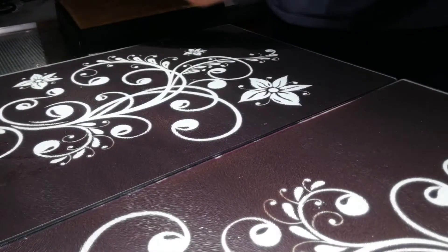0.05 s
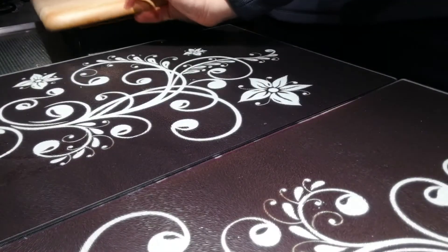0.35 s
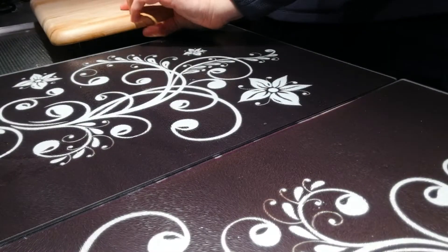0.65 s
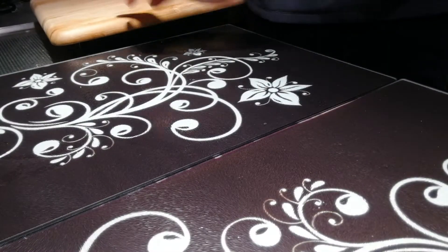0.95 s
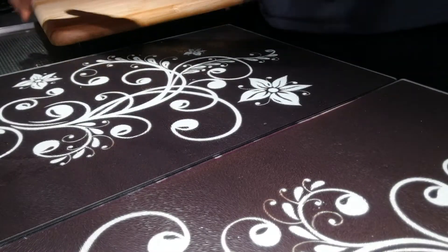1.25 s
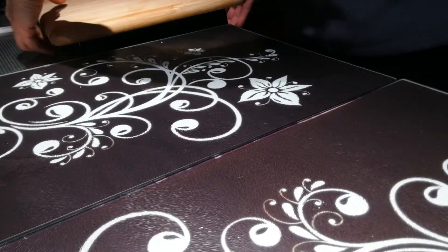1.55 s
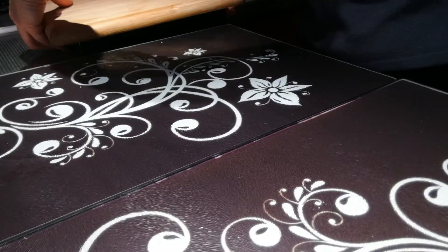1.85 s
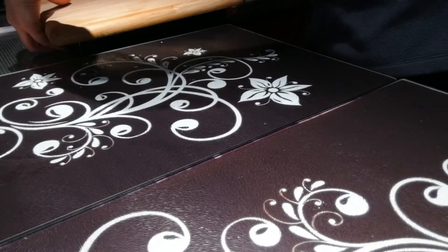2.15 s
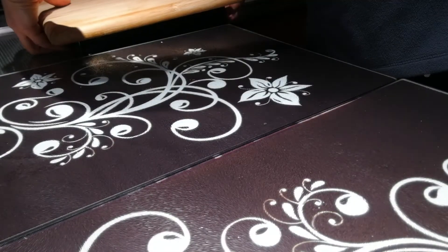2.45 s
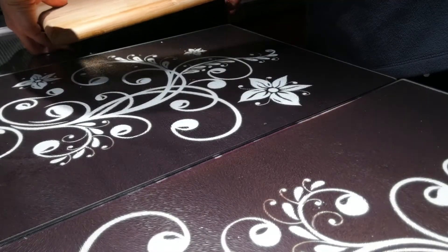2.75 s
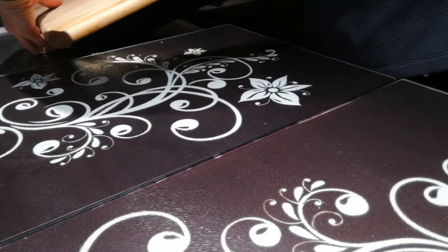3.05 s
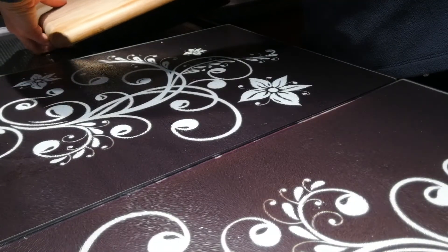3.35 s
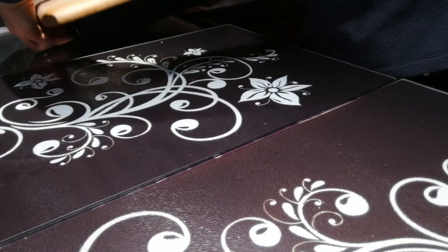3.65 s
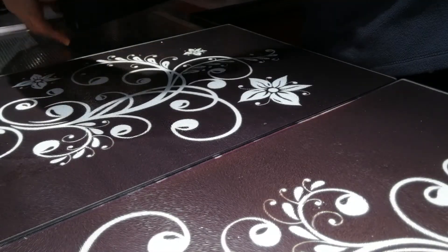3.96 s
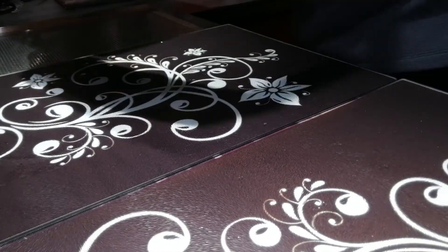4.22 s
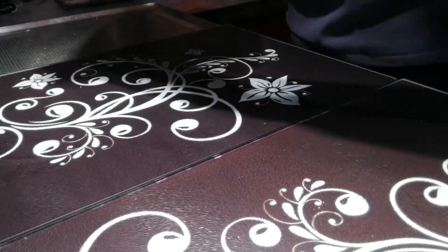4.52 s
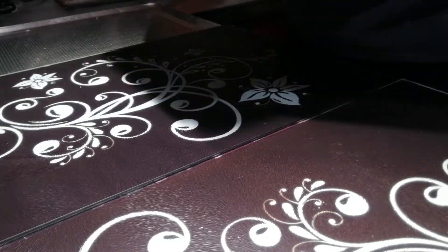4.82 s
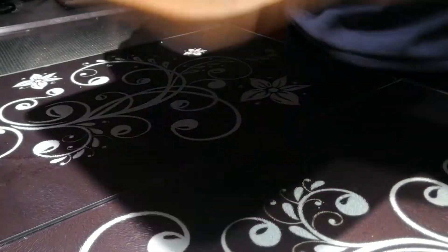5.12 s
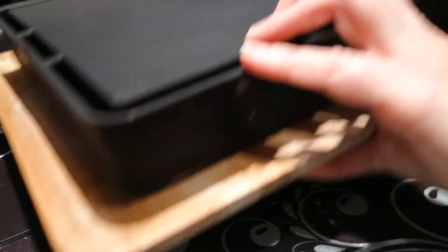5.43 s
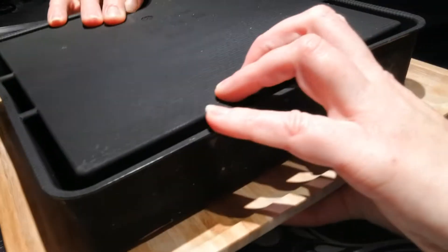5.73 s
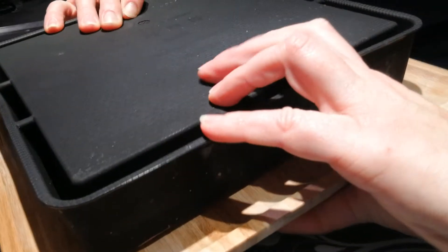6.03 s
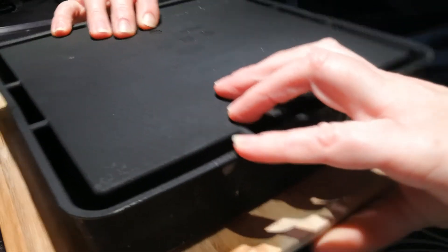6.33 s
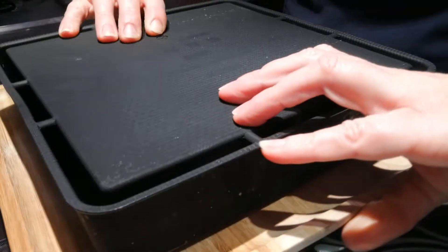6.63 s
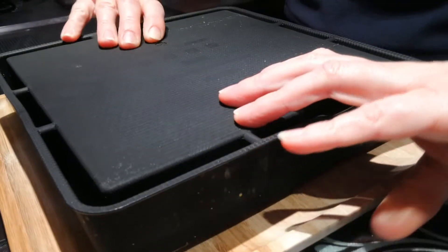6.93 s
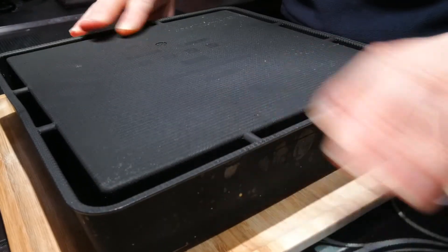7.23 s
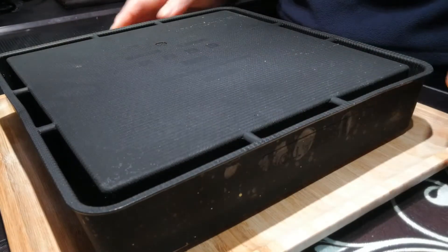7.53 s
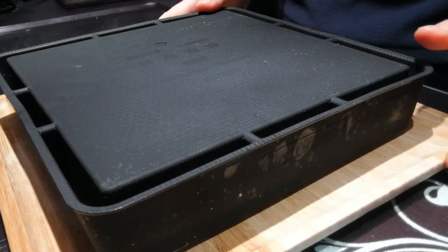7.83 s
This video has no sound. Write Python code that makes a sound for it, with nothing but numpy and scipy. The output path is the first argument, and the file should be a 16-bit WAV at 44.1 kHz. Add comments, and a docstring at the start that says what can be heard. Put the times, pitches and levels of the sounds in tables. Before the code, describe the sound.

Faint sleeve rustle and a low room rumble lie under scattered scrapes and bright clicks as a wooden board is lifted from a steel sink, with two tiny squeaks of the grip. Then, much closer to the microphones, the board knocks and slides onto a glass top, clacks loudly so the tray on it chatters, and thumps through the worktop. The small kitchen adds a short echo to each blow.

```python
"""Sleeves brush over a low steady rumble in a small hard kitchen, heard on a stereo pair of microphones.
A little way off, a wooden board carrying a baking tray and a silicone mould is lifted from a steel sink:
scrapes and clicks ring the rim and softly boom the basin, and the shifting grip squeaks thinly.
Close to the microphones it is set down on a glass cover: knocks, short slides, a loud clack that leaves
the tray chattering, then a heavy thump through the worktop. The walls answer each blow."""
import sys
import numpy as np
from scipy import signal
from scipy.fft import irfft, next_fast_len
from scipy.io import wavfile
from scipy.ndimage import uniform_filter1d

SR = 44100
rng = np.random.default_rng(int(sys.argv[2]) if len(sys.argv) > 2 else 0)


def wav_record(signal):
    """Record a signal, one row per channel, as 16-bit PCM in the file named by sys.argv[1]."""
    frames = np.transpose(np.atleast_2d(signal))
    bounded = np.clip(frames, -1, 1)
    # unit amplitude maps onto the largest positive 16-bit level
    quanta = np.round(bounded * 32767).astype(np.int16)
    wavfile.write(sys.argv[1], SR, quanta)


N = 356283
TAIL, TAPS, OCTAVES = 32768, 2048, 10  # samples of ring-out, samples of filter, noise bands
TIME, AGE = np.arange(N) / SR, np.arange(TAIL) / SR

# room tone spectrum: f/Hz, level/dB
RUMBLE_COLOUR = [(15, -45.5), (25, -21), (49, -4), (156, -15), (193, -2), (331, -16.5), (368, -17),
                 (684, -16.5), (741, -14.5), (895, -21.5), (1020, -14.5), (2010, -25.5), (2490, -26),
                 (3440, -24.5), (15500, -35.5)]
# air humming in the room: f/Hz, width/Hz, level/dB
HUM_BANDS = [(58.7, 10.7, -75), (138, 32, -73.5), (188, 69, -73), (231, 10, -74), (374.3, 27, -74.5)]
# likeness of the room tone at the two microphones: f/Hz, correlation
AIR_CORRELATION = [(60, 0.99), (180, 1), (550, -0.45), (1650, 0.1), (4970, -0.04), (15000, 0.036)]
# the same for contacts, friction and echo: f/Hz, correlation
MIC_CORRELATION = [(60, 0.56), (130, 0.86), (290, 1), (640, -0.66), (1400, 0.31), (3000, -0.13),
                   (15000, -0.13)]
# arm movements: fastest t/s, level/dB, rise/s, fall/s
SLEEVE_STROKES = [(0.05, -66, 0.15, 0.095), (1.2, -65.5, 0.81, 0.97), (4.3, -69, 0.45, 0.11),
                  (5.0, -63.5, 0.6, 0.4), (7.45, -69, 0.21, 0.27)]
# cloth friction spectrum: f/Hz, level/dB
CLOTH_COLOUR = [(100, -9), (500, -14.5), (1300, -2.5), (3000, 1), (6000, -4), (9000, -2.5), (15000, -23)]
# board scraping the sink: t/s, length/s, base level/dB, mid tilt, top tilt, base boom/dB, boom f/Hz
RIM_SCRAPES = [ (0.525, 0.091, -66, 18, 2, -77, 400), (1.478, 0.23, -48.5, 3, 6, -61.5, 200),
               (2.558, 0.12, -56.5, -25, 8, -75, 280), (3.266, 0.069, -50, -1, 7, -56, 170),
               (3.339, 0.018, -45, 3, 8, -50.5, 433), (3.578, 0.14, -57, 2, -8, -79, 202),
               (3.712, 0.254, -53.5, 20, -7, -50, 312)]
# board knocking the sink: t/s, level/dB, mid tilt, top tilt, boom/dB, boom f/Hz
RIM_KNOCKS = [ (0.637, -54.5, 40, -9, -51.5, 463), (1.4825, -43.5, 10, 4, -55, 310),
              (1.564, -42.5, 7, 7, -66, 420), (2.109, -32, 8.5, 3, -48.5, 740),
              (2.197, -45.5, 23, -3, -53, 380), (2.577, -47.5, -47, 12, -81, 300),
              (2.744, -32.5, -7.5, -7, -46, 280), (2.816, -34.5, 8.5, 11.5, -50, 212),
              (3.144, -56, 19, 7, -91, 304), (3.268, -47, 19, 6, -42, 400),
              (3.367, -30.5, -1.5, 14.5, -45.5, 195), (3.911, -54.5, -1, -4, -51.5, 154)]
# spectrum of a contact with steel: f/Hz, level/dB
STEEL_COLOUR = [(60, -9), (200, -7), (450, 1.5), (750, -3), (1300, 1.5), (1900, -2.5), (3300, 1.5),
                (5000, 3.5), (6300, 3), (8200, 9), (10500, -1.5), (15500, -19.5)]
# steel resonances: f/Hz, width/Hz, level/dB
STEEL_PEAKS = [(757, 70, 10), (1168, 32, 3.5), (1405, 19, 5.5), (2060, 23, 4), (3250, 130, 4.5),
               (4170, 34, 5), (4970, 310, 4), (5670, 95, 4), (6490, 130, 4.5), (7740, 110, -3),
               (9420, 68, 3), (10950, 91, -5)]
# the basin's boom: f/Hz, level/dB, t60/s
BASIN_MODES = [ (138, 1, .6), (186, 0, .6), (294, 2, .22), (402, -2, .22), (224, 7, 0.099),
               (356, -6.5, 0.29), (543, -8, 0.3), (677, 6, 0.038), (796, -2, 0.23), (814, 3, 0.15),
               (1150, -9, 0.29)]
# squeaks as the grip shifts: t/s, length/s, level/dB
GRIP_SQUEAKS = [(1.284, 0.16, -66.5), (3.111, 0.15, -63)]
# tones in each squeak: f/Hz, level/dB
GRIP_TONES = [(10290, 0), (12160, -5)]
# board landing on the glass: t/s, level/dB, contact bandwidth/Hz, tray ring re blow/dB, thump/dB
GLASS_BLOWS = [ (5.718, -61, 6100, -5, -55), (5.8097, -53.5, 3400, -13, -67.5),
               (5.9072, -29, 1745, -2.5, -47.5), (5.9937, -38, 1098, -14, -45.5),
               (6.022, -44, 1000, -13, -54.5), (6.067, -45, 800, -12.5, -49.5),
               (6.2603, -40.5, 1300, -9, -46), (6.4291, -16, 5680, 0.5, -41.5),
               (6.761, -24, 1505, -15.5, -25.5)]
# spectrum of the knocked board: f/Hz, level/dB
WOOD_COLOUR = [(40, -4), (150, -11.5), (350, 1.5), (550, -2.5), (800, 2.5), (1200, -1), (1900, -2),
               (2600, -1.5), (3300, 0.5), (4500, -4.5), (7500, -8.5), (10000, -11.5), (15000, -35.5)]
# the board's balance close to the microphones: f/Hz, left minus right/dB
BOARD_BALANCE = [(100, -2.5), (200, 0.5), (380, 4), (700, -1), (1300, -2.5), (2400, -1.5), (4400, 1.5),
                 (8000, -5)]
# the loaded tray: f/Hz, level/dB, t60/s, left minus right/dB
TRAY_RING = [ (425, -20, .2, 3), (840, -16, .15, -5), (1062, -1.5, .1, -2), (1420, -1.5, .09, -1),
             (1718, -14, .2, 0), (2236, -17, .25, 0), (3926, -14, .12, 3), (3400, 22, .008, 4),
             (348, -23.5, 0.062, 2.5), (649, -25, 0.027, -7), (3200, -13.5, 0.057, 11.5),
             (3297, -14.5, 0.066, -3.5), (3610, -9.5, 0.035, 9.5), (4670, -19.5, 0.052, 2.5),
             (6800, -21, 0.073, -4)]
# the worktop under the weight: f/Hz, level/dB, t60/s
WORKTOP_RING = [(33, -7.5, .35), (41.3, -6, 0.13), (57.64, 0.5, 0.37), (71.8, -3, 0.16), (86.5, -9, 0.41),
                (129, -6.5, 0.41), (150, -6, 0.37), (205, -18.5, 0.83), (233.2, -28, .45), (320, -19, 0.32),
                (397, -12.5, 0.21)]
# board sliding on the glass: fastest t/s, level/dB, rise/s, fall/s
SLIDE_STROKES = [(6.185, -44, 0.072, 0.043), (6.415, -39.5, 0.062, 0.0073), (6.755, -42, 0.043, 0.018)]
# friction spectrum of wood on glass: f/Hz, level/dB
SLIDE_COLOUR = [(60, -14), (300, -0.5), (700, -2), (1100, 2), (1700, -1.5), (3600, -1), (5500, -7.5),
                (9000, -10.5), (12000, -23), (16000, -30.5)]
# the tray singing along with a slide: f/Hz, width/Hz, level/dB
TRAY_PEAKS = [(355, 70.2, 6.5), (1066, 13, 19), (1620, 62, 5), (3770, 60, 0.5)]
# the kitchen's decay: f/Hz, t60/s
KITCHEN_T60 = [(80, 0.35), (250, 1), (600, 0.34), (1200, 0.55), (3500, 0.72), (6000, 0.6), (10000, 0.4),
               (15000, .25)]
# spectrum of its echo: f/Hz, level/dB
KITCHEN_COLOUR = [(60, -8), (250, 1), (600, -4.5), (1200, 0.5), (2500, 1), (4500, 0), (6500, -7),
                  (9000, -1), (15000, -5)]


def amp(db):
    """Decibels to gain."""
    return 10 ** (np.asarray(db) / 20)


def sides(db):
    """A left-right difference as dB for each microphone."""
    return np.array([[db / 2], [-db / 2]])


def read(points, hz):
    """A spectrum table read on a log-frequency axis."""
    f, value = np.transpose(points)
    return np.interp(np.log(hz + 1), np.log(f + 1), value)


def peaks(table, hz):
    """Resonances as bumps in dB on a spectrum."""
    return sum(db / (1 + ((hz - f) / width) ** 2) for f, width, db in table)


def bins(size):
    """Frequencies of a spectrum of this many samples."""
    return np.fft.rfftfreq(size, 1 / SR)


def unit_rms(x):
    """Scales to an rms of one."""
    return x / np.sqrt(np.mean(x ** 2) + 1e-30)


def add(mix, s, sound):
    """Mixes a stereo sound in at time s."""
    part = mix[:, max(round(s * SR), 0):][:, :sound.shape[1]]
    part += sound[:, :part.shape[1]]


def mic_pair(size, correlation):
    """Random spectra for two microphones, alike in the bass."""
    a, b, c, d = rng.standard_normal((4, size // 2 + 1))
    left, unrelated = a + 1j * b, c + 1j * d
    same = np.clip(read(correlation, bins(size)), -1, 1)
    return np.array([left, same * left + np.sqrt(1 - same ** 2) * unrelated])


def noise(colour, correlation):
    """Steady stereo noise of rms one; colour gives the gain at each frequency."""
    size = next_fast_len(N, True)
    return unit_rms(irfft(mic_pair(size, correlation) * colour(bins(size)), size)[:, :N])


def tint(x, db):
    """Minimum-phase filter with the gains db on the bins of TAPS."""
    log_gain = np.log(amp(np.maximum(db, db.max() - 100)))
    mirrored = np.concatenate([log_gain, log_gain[-2:0:-1]])
    taps = np.fft.ifft(np.exp(np.conj(signal.hilbert(mirrored)))).real
    return signal.fftconvolve(x, taps[None], axes=1)[:, :x.shape[1]]


def dense_modes(t60_of, rise, size):
    """Countless modes: noise of unit energy whose octaves swell quickly and die at their own speed."""
    centres = SR / 2 / 2. ** np.arange(OCTAVES)[::-1]
    octave = np.round(np.interp(np.log(bins(size) + 1), np.log(centres), np.arange(OCTAVES)))
    spectra, t, out = mic_pair(size, MIC_CORRELATION), AGE[:size], 0
    for k, hz in enumerate(centres):
        band = octave == k
        envelope = np.exp(-np.log(1000) * t / t60_of(hz)) * (1 - np.exp(-t / rise))
        wave = irfft(spectra * band) * envelope
        out = out + wave * np.sqrt(band.mean() / (wave ** 2).sum(1, keepdims=True))
    return out


def burst(db, rise, t60, damping):
    """One contact, with the energy of 10 ms at rms one; the treble dies sooner than the bass."""
    x = tint(dense_modes(lambda hz: t60 * (hz / 2000) ** -damping, rise, size=TAIL // 2), db)
    return unit_rms(x) * np.sqrt(SR / 100 / x.shape[1])


def ring(modes, weights_db, rise, lag):
    """Damped modes set going by a push; the right microphone hears them lag seconds later."""
    t = np.maximum(AGE - np.array([[0], [lag]]), 0)
    waves = (amp(db + weight) * np.exp(-np.log(1000) * t / t60) * np.sin(2 * np.pi * hz * t)
             for (hz, db, t60, *_), weight in zip(modes, weights_db))
    return sum(waves) * (1 - np.exp(-t / rise))


def strokes(rows):
    """Strength over time of movements that each gather speed and then stop."""
    power = sum(amp(db) ** 2 * np.exp(-2 * np.maximum((s - TIME) / rise, (TIME - s) / fall))
                for s, db, rise, fall in rows)
    return np.sqrt(power)


def rub(strength, colour_db, grain_db, grain_hz):
    """Friction: hiss that follows the stroke and catches unevenly."""
    pole = np.exp(-2 * np.pi * grain_hz / SR)
    catches = unit_rms(signal.lfilter([1], [1, -pole], rng.standard_normal(N)))
    hiss = noise(lambda hz: amp(colour_db(hz)), MIC_CORRELATION)
    return unit_rms(hiss * amp(grain_db * catches)) * strength


def judder(strength, body):
    """Countless small slips keep a body ringing for as long as the stroke lasts."""
    slips = strength * rng.standard_normal(N)
    return signal.fftconvolve(slips[None], body / np.linalg.norm(body[0]), axes=1)[:, :N]


def room_tone(rumble_db=-63):
    """Steady rumble and hiss, with the air humming in a few broad low resonances."""
    out = amp(rumble_db) * noise(lambda hz: amp(read(RUMBLE_COLOUR, hz)), AIR_CORRELATION)
    for f, width, db in HUM_BANDS:
        out += amp(db) * noise(lambda hz: 1 / (1 + ((hz - f) / width) ** 2), AIR_CORRELATION)
    return out


def sleeves():
    """Cloth brushes faintly with each movement."""
    return rub(strokes(SLEEVE_STROKES), lambda hz: read(CLOTH_COLOUR, hz), grain_db=2.1, grain_hz=25.14)


def spot_db(hz, mid, top):
    """How the place and hardness of a contact tilt the steel's sound, below 5.5 and above 8.5 kHz."""
    return mid * read([(1100, 0.79), (5500, 0)], hz) + top * read([(8500, 0), (13000, 0.9)], hz)


def steel_db(hz, mid, top):
    """The spectrum of one contact with the sink."""
    return read(STEEL_COLOUR, hz) + peaks(STEEL_PEAKS, hz) + spot_db(hz, mid, top)


def basin(boom_hz):
    """A push booms the basin modes near its centre pitch."""
    reach_db = [max(-14 * np.log2(hz / boom_hz) ** 2, -20) for hz, *_ in BASIN_MODES]
    return ring(BASIN_MODES, reach_db, rise=0.0041, lag=0.00025)


def sink_scrapes(rise_s=0.0032, bite_db=5, bite_s=0.09, sag_db_per_s=26, release_s=0.022):
    """The board's edge digs in, eases off and lets go: the steel hisses and the basin judders."""
    out = np.zeros((2, N))
    for s, length, db, mid, top, boom_db, boom_hz in RIM_SCRAPES:
        age = np.maximum(TIME - s, 0)
        force = amp(bite_db * np.exp(-age / bite_s) - sag_db_per_s * age)
        release = np.exp(-np.maximum(age - length, 0) / release_s)
        press = (1 - np.exp(-age / rise_s)) * force * release
        out += rub(amp(db) * press, lambda hz: steel_db(hz, mid, top), grain_db=3.0, grain_hz=60)
        out += judder(amp(boom_db) * press, basin(boom_hz))
    return out


def sink_knocks(rise_s=0.00044, ring_db=-20, scatter_db=2.5):
    """Bright clicks of the board ring the steel rim and boom the basin."""
    out, hz = np.zeros((2, N)), bins(TAPS)
    rim = [(f, db, 2.4 / width) for f, width, db in STEEL_PEAKS]  # narrow resonances ring longest
    rim_hz = np.transpose(rim)[0]
    spots = rng.uniform(-1.2, 1, (len(RIM_KNOCKS), len(rim)))  # each spot struck favours other modes
    for (s, db, mid, top, boom_db, boom_hz), spot in zip(RIM_KNOCKS, spots):
        add(out, s, amp(db) * burst(steel_db(hz, mid, top), rise_s, t60=0.1, damping=0.17))
        rim_db = spot_db(rim_hz, mid, top) - max(mid, 0) / 2 + scatter_db * spot
        add(out, s, amp(db + ring_db) * ring(rim, rim_db, rise_s, lag=0.00058))
        add(out, s, amp(boom_db) * basin(boom_hz))
    return out


def grip_squeaks(waver=0.0032):
    """The grip shifts: two high tones start quickly, waver and fade."""
    out = np.zeros((2, N))
    for s, length, db in GRIP_SQUEAKS:
        progress = np.clip((TIME - s) / length, 0, 1)
        swell = (1 - np.exp(-progress / 0.046)) * np.sqrt(1 - progress)
        for hz, tone_db in GRIP_TONES:
            drift = unit_rms(uniform_filter1d(rng.standard_normal((2, N)), size=200))
            phase = 2 * np.pi * np.cumsum(hz * (1 + waver * drift), 1) / SR
            out += amp(db + tone_db) * swell * np.sin(phase)
    return out


def contact_db(hz, corner_hz):
    """A soft contact cannot shake anything much faster than its own duration."""
    return np.maximum(-10 * np.log10(1 + (hz / corner_hz) ** 6.95), -32)


def set_down():
    """Close blows knock the wood, ring the tray and thump the worktop; gives direct sound and room feed."""
    to_room, hz = np.zeros((2, N)), bins(TAPS)
    thump = ring(WORKTOP_RING, np.zeros(len(WORKTOP_RING)), rise=0.00074, lag=0.000092)
    direct = worktop_drag(thump)
    balance_db = read(BOARD_BALANCE, hz) / 2
    for s, db, corner_hz, ring_db, thump_db in GLASS_BLOWS + tray_chatter():
        wood_db = read(WOOD_COLOUR, hz) + contact_db(hz, corner_hz)
        wood = burst(wood_db, rise=0.00052, t60=0.042, damping=0.41)
        wood = np.vstack([tint(wood[:1], balance_db), tint(wood[1:], -balance_db)])
        tray_db = [contact_db(f, corner_hz) + sides(side_db) for f, _, _, side_db in TRAY_RING]
        tray = amp(ring_db) * ring(TRAY_RING, tray_db, rise=0.0013, lag=0.00019)
        add(direct, s, amp(db) * wood)
        add(direct, s, amp(db) * tray + amp(thump_db) * thump)
        room_db = -5 + 0.56 * ring_db  # a freely ringing tray sends more into the room
        add(to_room, s, amp(db + room_db) * wood)
        add(to_room, s, amp(db + room_db) * tray / 2)  # only part of the tray's ring goes into the echo
    return direct, to_room


def worktop_drag(thump, from_s=5.84, to_s=6.8, edge_s=0.025, start_db=-56, growth_db_per_s=8):
    """The worktop rumbles under the moving board, louder as the glass takes more of the weight."""
    on_glass = np.interp(TIME, [from_s, from_s + edge_s, to_s, to_s + edge_s], [0, 1, 1, 0])
    return judder(on_glass * amp(start_db + growth_db_per_s * (TIME - from_s)), thump)


def glass_slides():
    """Wood hisses over the glass, close to the microphones, and the tray sings along."""
    return rub(strokes(SLIDE_STROKES), lambda hz: read(SLIDE_COLOUR, hz) + peaks(TRAY_PEAKS, hz),
               grain_db=1.5, grain_hz=91.5)


def tray_chatter(start_s=6.436, gap_s=0.015, count=18, start_db=-32.5, fall_db_per_s=51):
    """Uneven, ever weaker contacts of the tray after the clack, as rows like GLASS_BLOWS."""
    corner_hz, ring_db, thump_db = 3100, -4, -13  # ring and thump relative to each contact
    ages = gap_s * (np.arange(count) + 0.3 * rng.uniform(-1, 1, count))
    levels = start_db - fall_db_per_s * ages
    return [(start_s + age, db, corner_hz, ring_db, db + thump_db) for age, db in zip(ages, levels)]


def kitchen(x):
    """The diffuse echo off the hard walls of a small room."""
    tail = dense_modes(lambda hz: read(KITCHEN_T60, hz), rise=0.0023, size=TAIL)
    tail = tint(tail, read(KITCHEN_COLOUR, bins(TAPS)))
    return signal.fftconvolve(x, tail, axes=1)[:, :N]


def scene():
    """From the microphones: the sink farther off and slightly left, the glass close, the room around."""
    sink = (sink_knocks() + sink_scrapes()) * amp(sides(db=1.2))
    blows, blows_to_room = set_down()
    slides = glass_slides()
    cloth = sleeves()
    echo = kitchen(amp(-7.5) * sink + blows_to_room + amp(-6.5) * slides)
    return sink + blows + slides + cloth + grip_squeaks() + echo + room_tone()


def record(dry):
    """The recorder clips at full scale, then cuts the treble above 15.9 kHz."""
    lowpass = signal.firwin(511, 15900, window=("kaiser", 9), fs=SR)
    return signal.oaconvolve(np.clip(dry, -1, 1), lowpass[None], "same", axes=1)


dry = scene()
out = record(dry)
wav_record(out)
```